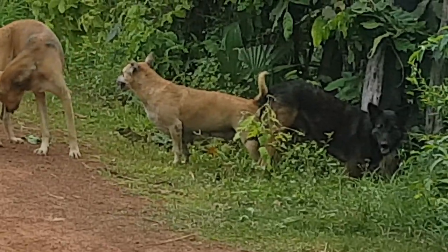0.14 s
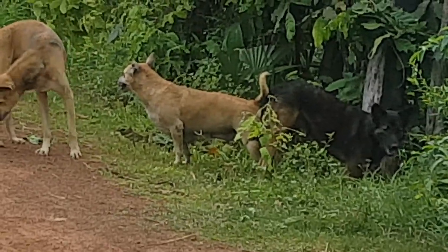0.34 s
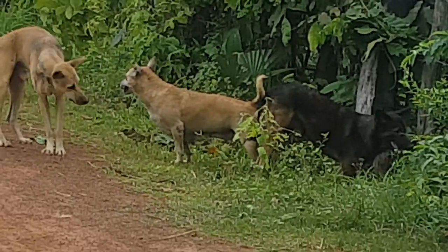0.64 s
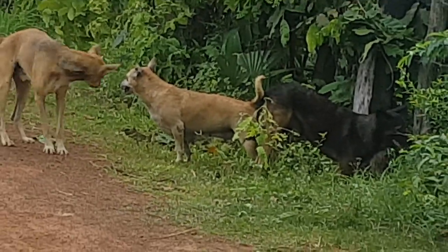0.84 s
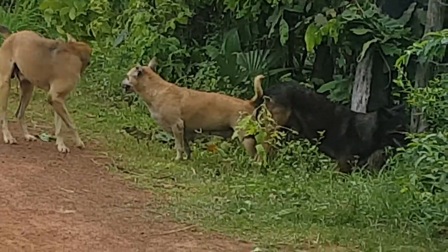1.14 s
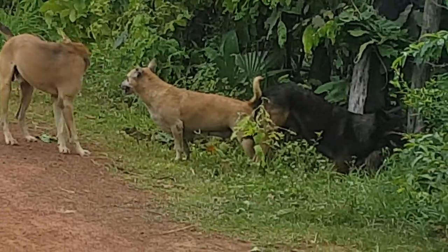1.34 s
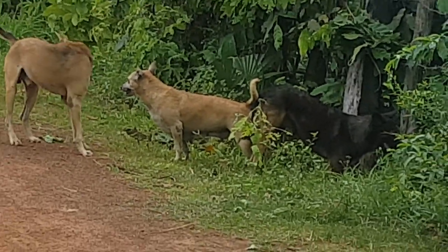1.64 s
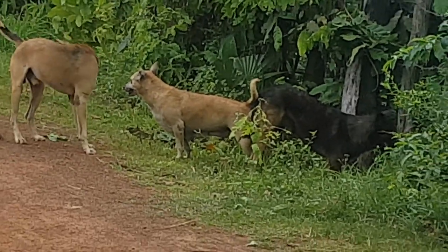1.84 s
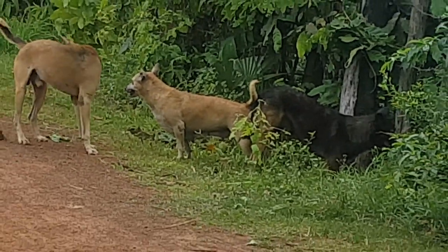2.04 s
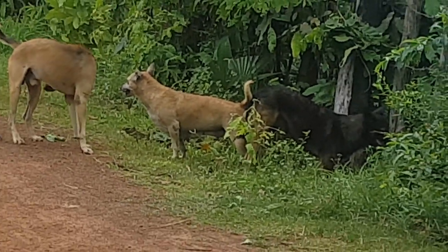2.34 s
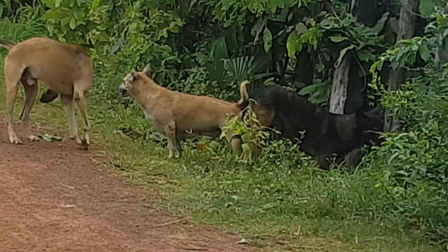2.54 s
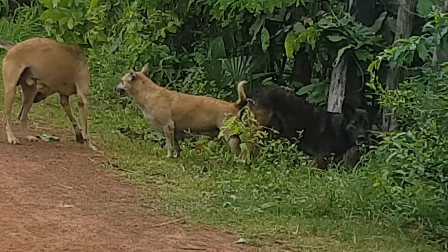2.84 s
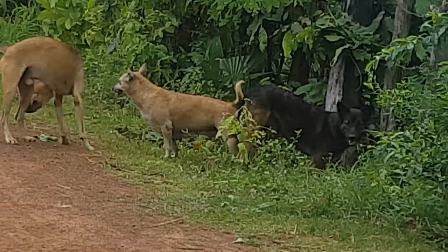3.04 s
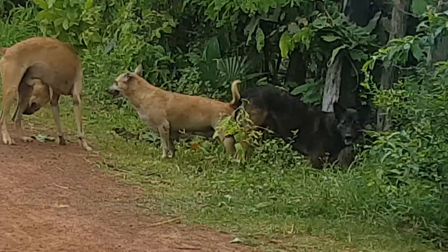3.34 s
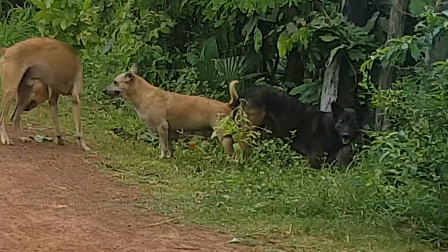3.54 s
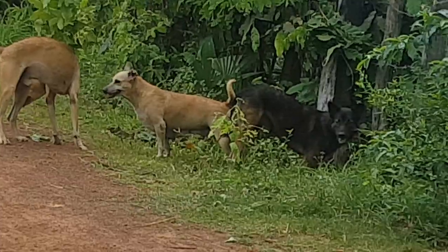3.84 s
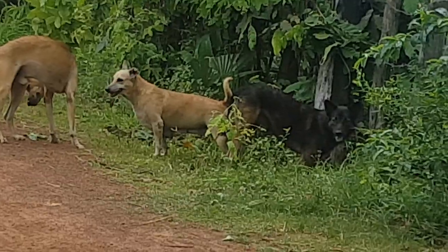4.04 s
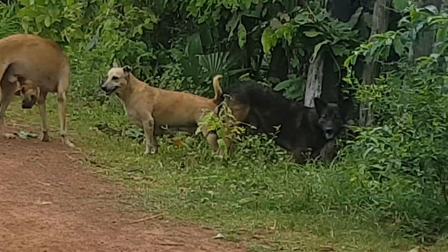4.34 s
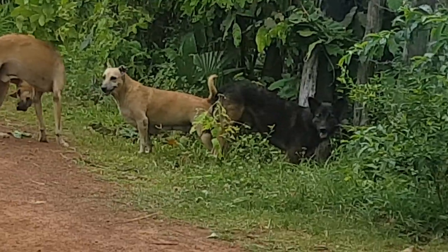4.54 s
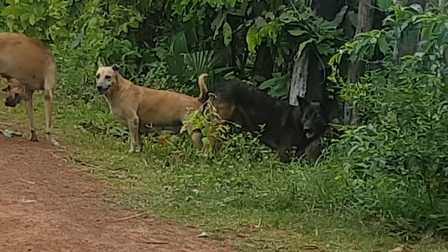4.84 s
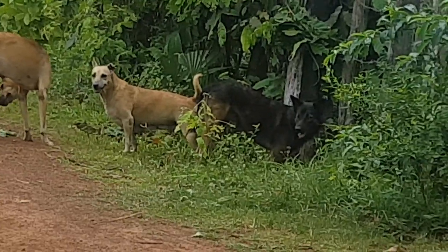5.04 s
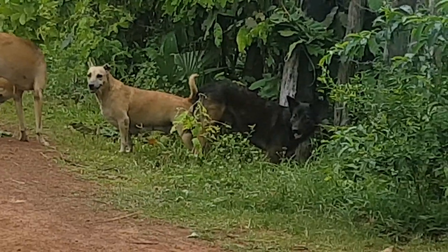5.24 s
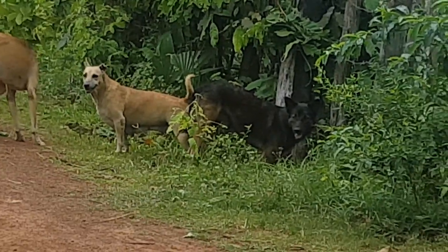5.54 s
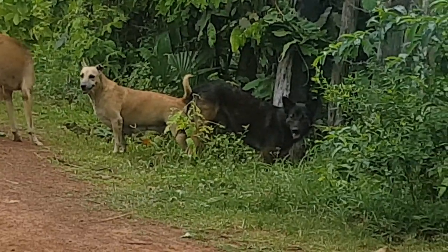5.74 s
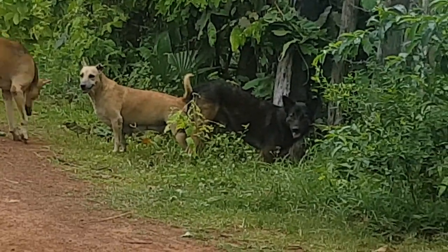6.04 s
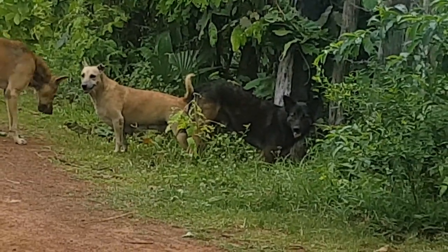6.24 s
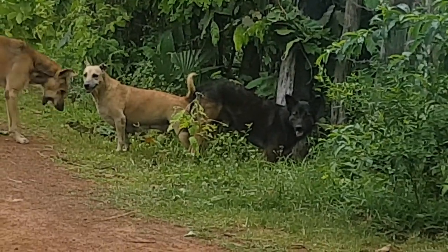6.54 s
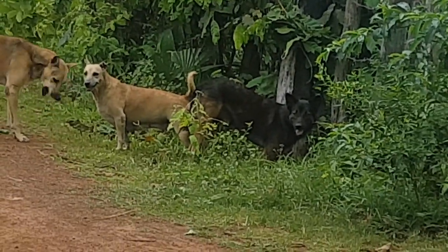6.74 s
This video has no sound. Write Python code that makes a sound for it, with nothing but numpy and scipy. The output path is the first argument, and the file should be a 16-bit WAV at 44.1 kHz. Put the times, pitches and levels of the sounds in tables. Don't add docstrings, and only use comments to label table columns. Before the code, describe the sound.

Quiet open-air hiss and regular high bird chips come first, with a muffled distant motor and one dry leaf brush. The engine then nears quickly, its buzzing low note growing rough and rattly through gaps in foliage. It is loudest around five seconds, wheels crunching grit, then fades under a small wind buffet. Handheld stereo microphone at the roadside.

```python
import sys
import numpy as np
from scipy import signal
from scipy.io import wavfile
from scipy.ndimage import uniform_filter1d, map_coordinates

SR = 44100
rng = np.random.default_rng(int(sys.argv[2]) if len(sys.argv) > 2 else 0)


def voltage_ratio(decibels):
    exponent = np.asarray(decibels, float) / 20
    return 10 ** exponent


def generate_wav(sig):
    pcm = np.round(np.clip(np.atleast_2d(sig).T, -1, 1) * 32767).astype(np.int16)
    wavfile.write(sys.argv[1], SR, pcm)


N = 303827
T = np.arange(N) / SR

# [t/s, f/Hz]
SPEED = [(0, 36.95), (1.3, 36.68), (2.6, 36.62), (3.3, 36.39), (3.85, 35.92), (4.5, 35.95), (5.55, 36.03),
         (6.15, 35.39), (6.89, 35.43)]
# [t/s, lead/samples]
LEFT_LEAD = [(0, 13), (2, 8.4), (3.5, 7.63), (5, 5.8), (6.89, 1.8)]


def engine():
    turns = 0.7 + np.cumsum(columns(SPEED)[0]) / SR
    turns = turns + .011 * np.sin(2 * np.pi * 5.04 * T - 2.19) + .008 * drift(rate_hz=5)
    strength_db = 0.88 * np.interp(turns + 0.18, np.arange(400), rng.standard_normal(400))
    bright = rasp(turns, strength_db) + clatter(turns)
    direct = ports(exhaust(turns, strength_db) + bright, columns(LEFT_LEAD)[0])
    return direct + voltage_ratio(-9) * foliage(bright, t60=.2)


# [multiple of the firing rate, level/dB]
OVERTONES = [(1, -44.5), (2, -34), (3, -23), (4, -9.5), (5, 0), (6, -4.5), (7, -18), (8, -16.5), (9, -12),
             (10, -11), (11, -17.5), (12, -36), (13, -35), (14, -34.5), (15, -36), (16, -45.5), (17, -46.5),
             (18, -43.5), (19, -52), (20, -56.5), (21, -55.5), (22, -55)]
# [t/s, nearness as level/dB, extra level/dB as the tail pipe faces this way]
DRIVE = [(0, -43.5, 6.5), (.6, -46.5, 6.5), (1.3, -48.5, 15.5), (2.2, -42.5, 5), (2.6, -37.5, 9.5),
         (2.95, -28, 5), (3.3, -32.5, 10.5), (3.65, -29.5, 14), (3.85, -27, 1.5), (4.15, -22, 1.5),
         (4.5, -24.5, 6), (4.8, -20, -2), (5.2, -20, -2.5), (5.55, -20.5, -2.5), (5.9, -27, 6),
         (6.15, -31, 7.2), (6.5, -32.5, 5), (6.89, -38.5, 2.5)]


def exhaust(turns, strength_db, fading_db=3.0):
    rate_hz, (near_db, facing_db) = columns(SPEED)[0], columns(DRIVE)
    jet_gap_db, upper_gap_db, _ = gaps()
    table = dict((round(k), db) for k, db in OVERTONES)

    level_db = {2: follows(far_db=-53.5, share=0.67) - 11.0, 3: follows(far_db=-61, share=0.98)}
    for k in range(4, 7):
        level_db[k] = near_db + table[k]

    pipe_hz = np.interp(T, (3, 3.4), (345, 301.3))
    for k in range(7, 13):
        level_db[k] = near_db + facing_db + table[k]
        level_db[k] += 2.36 * abs(k - 9) - 4.45 * np.abs(k * rate_hz - pipe_hz) / 36
        level_db[k] -= 13 * max(k - 10, 0) * np.clip(T - 4.4, 0, .5)

    upper_db = follows(far_db=-58, share=0.033) + upper_gap_db
    for k in range(13, 23):
        level_db[k] = upper_db + table[k] + 27.5

    phase = causal_phase(OVERTONES)
    wander = np.interp(np.minimum(near_db, -26) + jet_gap_db, [-42, -18], [.4, .12])
    out = np.zeros(N)
    for k, db in level_db.items():
        fade, slip, flutter = drift(rate_hz=4.0), drift(rate_hz=4.0), drift(rate_hz=12.0)
        share = .4 if 4 <= k <= 6 else 1
        db = db + fading_db * fade * share + 4.5 * wander * flutter + echo_db(k)
        angle = 2 * np.pi * k * (turns + .08) + phase[k] + wander * (slip + .4 * flutter) + 1.5
        out += np.sqrt(2) * voltage_ratio(db) * np.cos(angle)
    return out * voltage_ratio(strength_db)


# [t/s, f/Hz, level/dB, half length/s]
ECHOES = [(.4, 227, -10, 0.42), (1.313, 343, -7, .07), (1.41, 128, 13.5, 0.33), (1.437, 178, 9, 0.044),
          (2.27, 288, 11.5, 0.26), (2.775, 233.4, 9.5, 0.23), (3.07, 350, -21, 0.16), (3.1, 106, 6.5, .08),
          (3.17, 246, -30, 0.054), (3.5, 203, 14, 0.16), (3.512, 187, -9.5, 0.1), (3.89, 216.5, -20.5, 0.1),
          (4.084, 139, -14, 0.11), (4.421, 355, -5.5, 0.08), (4.743, 108, 3.5, .12), (4.892, 303, 5.5, .05),
          (5.071, 266.6, 16.5, .09), (5.13, 182, 4, 0.09), (5.117, 225, -7, 0.076), (5.384, 308, 8, 0.15),
          (5.44, 228, -9, 0.15), (5.696, 210, 6.5, .07), (5.803, 164, -4.5, 0.026), (5.92, 192, 8.5, 0.068),
          (6.236, 184, -18.5, 0.038), (6.248, 324.5, -13.5, 0.13), (6.272, 161, 12.5, 0.16),
          (6.6, 175, 8, 0.13), (6.673, 345, -13.5, 0.12), (6.85, 134.3, 11, .12)]


def echo_db(k):
    total_db = np.zeros(N)
    for s, hz, gain_db, half in ECHOES:
        if abs(36.2 * k - hz) < 70:
            total_db += gain_db * np.exp(-((35.2 * k - hz) / 30) ** 2) * bump(s, half)
    return total_db


def causal_phase(table):
    k, db = np.transpose([(0, -45)] + list(table) + [(30, -60)])
    grid = np.abs(np.fft.fftfreq(1024, 1 / 128))
    log_gain = np.interp(grid, k, db) * np.log(10) / 20
    return -np.imag(signal.hilbert(log_gain))[::8]


# [f/Hz, level/dB per Hz]
JET_COLOUR = [(300, -26.5), (450, -5.5), (700, -13.5), (1000, -15.5), (1450, -15.5), (1800, -24.5),
              (2300, -25.5), (3500, -33.5), (4600, -63)]
# [t/s, f/Hz]
ECHO_BAND = [(0, 751), (2.9, 862), (3.45, 1277), (4.1, 727), (4.7, 832), (5.15, 1050), (5.5, 1703),
             (5.9, 1377), (6.89, 1198)]


def rasp(turns, strength_db, puff=.2):
    jet_gap_db, _, gear_gap_db = gaps()
    jet = evened(hiss(JET_COLOUR, patchy_db=.8, size=512)[0])
    jet = evened(jet + 1.2 * resonate(jet, columns(ECHO_BAND)[0], width=450))
    steady = np.interp(gear_gap_db, [6, 18], [.7, .14])
    gate = steady + np.exp(-((turns + .08) % 1) / puff)
    gate /= np.sqrt(uniform_filter1d(gate ** 2, 2436))
    level_db = follows(far_db=-59, share=0.13) + jet_gap_db + 0.14 * strength_db + 1.5
    return voltage_ratio(level_db) * jet * gate


# [f/Hz, width/Hz, level/dB]
VALVE = [(4050, 250, -1), (5150, 300, -4), (6200, 250, 0), (6800, 300, -6), (7650, 250, -3),
         (8600, 400, -12), (12300, 1000, -27)]


def clatter(turns, spread_db=2.8):
    gap_db = gaps()[2]
    clatter_db = follows(far_db=-82, share=0.17) + gap_db
    whine_db = follows(far_db=-78, share=.35) + np.minimum(gap_db, 11)
    cycle = np.floor(turns + .02).astype(int)
    shares = rng.standard_normal((400, len(VALVE)))
    knock = uniform_filter1d(.11 + np.exp(-((turns + .02) % 1) / .1), 60)
    rattle = np.zeros(N)
    for k, (hz, width, db) in enumerate(VALVE):
        level_db = db + spread_db * shares[cycle, k] + 1.2 * drift(rate_hz=1.8)
        strike = voltage_ratio(level_db) * knock * rng.standard_normal(N)
        rattle += ring(strike, hz, width) * width / 300
    whine = ring(ring(rng.standard_normal(N), 2450, 110), 2450, 110)
    return voltage_ratio(clatter_db) * evened(rattle) + voltage_ratio(whine_db) * evened(whine)


# [middle t/s, half length/s, jet level/dB, upper pipe note level/dB, valve level/dB]
GAPS = [(1.11, 0.11, 4.5, 2.2, 0), (3.105, 0.11, 4, 1, 1), (3.326, 0.14, 1.5, 3.5, 11),
        (3.535, .22, 13.5, 9.3, 19.5), (3.762, 0.09, 6, 5.7, 7), (3.933, 0.15, 4.5, 3, 14),
        (4.067, 0.033, 7.5, 6.4, 2.5), (4.26, 0.11, 4.5, 11, 3), (4.484, 0.13, 4, 12, 1.5),
        (5.147, 0.22, 6, 2.4, -3), (5.453, 0.17, 4, 3, 4)]


def gaps():
    return sum(np.array(gains)[:, None] * bump(s, half) for s, half, *gains in GAPS)


def follows(far_db, share):
    return far_db + share * (uniform_filter1d(columns(DRIVE)[0], size=9000) + 43)


# [f/Hz, level/dB per Hz]
GRIT = [(1200, -25), (1700, -3), (2500, 1.5), (4000, -4), (5200, -10.5), (7000, -28)]


def tyres():
    level_db = follows(far_db=-71, share=.25) + 3.0
    return voltage_ratio(level_db) * evened(hiss(GRIT, patchy_db=2.0, size=512))


# [f/Hz, level/dB per Hz]
THUD = [(15, -39), (30, -12), (45, -4), (80, -2.5), (130, -6), (250, 2), (390, 0), (480, -37)]


def rumble():
    traffic_db = -53
    level = np.hypot(voltage_ratio(follows(far_db=-53.5, share=0.67)), voltage_ratio(traffic_db))
    thud = evened(hiss(THUD, patchy_db=.4, size=4096))
    gust = voltage_ratio(-40.5) * bump(6.72, half=.12) * evened(band(thud, 25, 95))
    return level * thud + gust


# [t/s, peak level/dB, top f/Hz, left minus right level/dB]
CHIPS = [
    (0.0034, -61, 7000, 3),
    (0.6788, -51, 7100, 1.0),
    (1.488, -50, 7100, -5.0),
    (2.2568, -51, 7100, -1.0),
    (3.0613, -48.5, 6977, -8),
    (3.889, -50.5, 6983, 3),
    (4.5778, -49.5, 6870, -1),
    (5.3233, -49, 6962, -3),
    (6.053, -52.5, 6950, 0),
]


def bird():
    u = np.arange(1600) / 1600
    dry, wide = np.zeros(N), np.zeros((2, N))
    for s, db, hz, pan_db in CHIPS:
        arch_hz = hz + 30 - 2600 * (u - .48) ** 2
        whistle = np.sin(2 * np.pi * np.cumsum(arch_hz) / SR)
        chip = voltage_ratio(db - 8.5) * whistle * signal.windows.tukey(1600, .3)
        at = max(round(s * SR) - 280, 0)
        dry[at:at + 1600] += chip
        wide[:, at:at + 1600] += chip * voltage_ratio([[pan_db / 2], [-pan_db / 2]])
    return wide + voltage_ratio(-1.5) * foliage(dry, t60=.42)


def foliage(x, t60):
    at = np.arange(300, 12000, 20) + rng.integers(0, 20, (2, 585))
    taps = np.zeros((2, 12100))
    echoes = rng.choice([-1., 1.], at.shape) * voltage_ratio(-60 * at / SR / t60)
    np.put_along_axis(taps, at, echoes, 1)
    return signal.oaconvolve(x[None], taps / np.linalg.norm(taps[0]), axes=1)[:, :N]


# [t/s, peak level/dB, decay/s]
RUSTLES = [
    (1.3633, -53, 0.037),
    (5.2232, -64, 0.027),
    (6.7247, -73, 0.015),
]


def rustles():
    level = np.zeros(N)
    for s, db, decay in RUSTLES:
        level += voltage_ratio(db - 7) * (T > s) * np.exp(-np.maximum(T - s, 0) / decay)
    return level * evened(band(rng.standard_normal((2, N)), 3000, 15500))


# [f/Hz, level/dB per Hz]
AIR = [(250, -20), (430, 0), (523, -9.5), (590, -9), (636, -8), (728, -8.5), (984, -14), (1090, -14),
       (1290, -13), (2120, -18.5), (3040, -26), (6270, -31.5), (15700, -44.5)]


def air():
    far = hiss(AIR, patchy_db=2.0)
    mic = evened(band(rng.standard_normal((2, N)), 11500, 21000))
    return voltage_ratio(-60) * far / np.std(band(far, 1500, 15000)) + voltage_ratio(-71.5) * mic


# [f/Hz, likeness 0 to 1]
SAME = [(30, 0.54), (100, 0.89), (300, 0.87), (700, 0.63), (2000, .35), (5000, 0.096), (15000, .02)]


def hiss(points, patchy_db, size=1024):
    frames, hz = 4 * N // size + 5, np.fft.rfftfreq(size, 1 / SR)
    a, b, c, d, patches = rng.standard_normal((frames, len(hz), 5)).T
    patches = evened(uniform_filter1d(uniform_filter1d(patches, 10, 0), 12, 1))
    same, left = np.clip(read(SAME, hz), -1, 1)[:, None], a + 1j * b
    early = np.exp(2j * np.pi * hz * 17.5 / SR)[:, None]
    right = same * early * left + np.sqrt(1 - same ** 2) * (c + 1j * d)
    z = np.array([left, right])
    inside = (hz < 1.02 * points[-1][0])[:, None]
    z *= voltage_ratio(read(points, hz)[:, None] + patchy_db * patches) * inside
    return signal.istft(z, nperseg=size, noverlap=3 * size // 4)[1][:, :N]


def ports(x, lead):
    return np.array([x, map_coordinates(x, [np.arange(N) - lead], order=3, mode="nearest")])


def ring(x, hz, width):
    r = np.exp(-np.pi * width / SR)
    return signal.lfilter([np.sin(2 * np.pi * hz / SR)], [1, -2 * r * np.cos(2 * np.pi * hz / SR), r * r], x)


def resonate(x, hz, width):
    turn, r = np.exp(2j * np.pi * np.cumsum(hz) / SR), np.exp(-np.pi * width / SR)
    return 2 * (turn * signal.lfilter([1 - r], [1, -r], x / turn)).real


def band(x, lo_hz, hi_hz):
    return signal.sosfilt(signal.butter(2, [lo_hz, hi_hz], "band", fs=SR, output="sos"), x)


def drift(rate_hz):
    steps = rng.standard_normal(int(N / SR * 100) + 9)
    span = max(int(50 / rate_hz), 1)
    steps = uniform_filter1d(uniform_filter1d(steps, span), span)
    return np.interp(T * 100, np.arange(len(steps)), evened(steps))


def bump(s, half):
    coarse = T[::64]
    return np.repeat(np.exp(-((coarse - s) / half) ** 2), 64)[:N]


def evened(x):
    return x / np.sqrt(np.mean(x ** 2) + 1e-20)


def columns(rows):
    s, *values = np.transpose(rows)
    return [np.interp(T, s, v) for v in values]


def read(points, hz):
    f, value = np.transpose(points)
    return np.interp(np.log(hz + 1), np.log(f + 1), value)


def scene():
    return engine() + tyres() + rumble() + bird() + rustles() + air()


def roll_off(x):
    return signal.sosfilt(signal.butter(12, 16250, fs=SR, output="sos"), x)


def record(dry):
    lowpass = signal.firwin(1023, 15780, window=("kaiser", 9), fs=SR)
    mix = signal.oaconvolve(dry, lowpass[None], "same")
    return roll_off(mix)


dry = scene()
out = record(dry)
generate_wav(out)
```